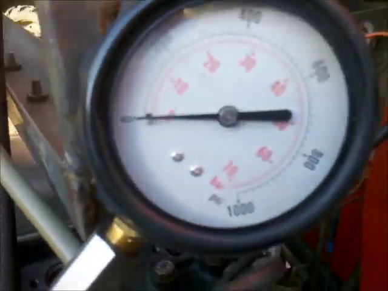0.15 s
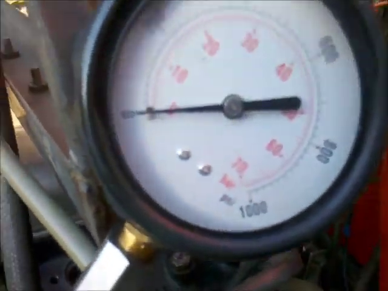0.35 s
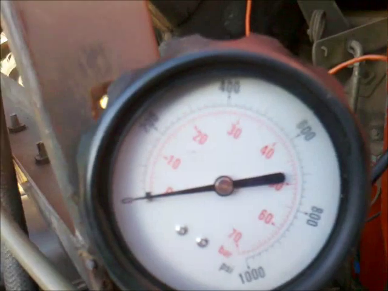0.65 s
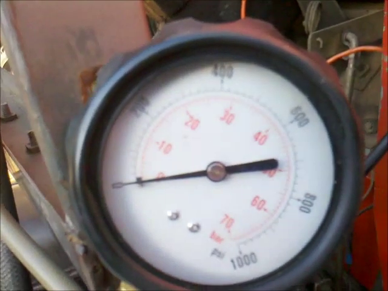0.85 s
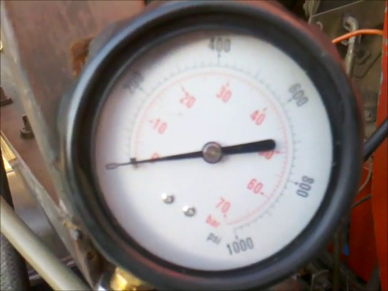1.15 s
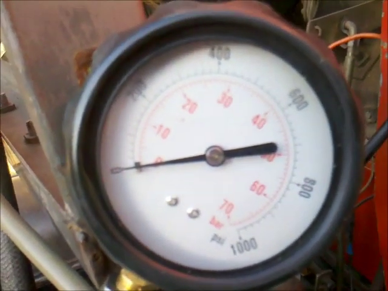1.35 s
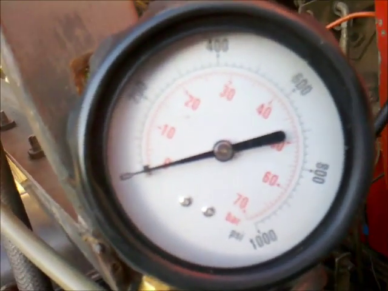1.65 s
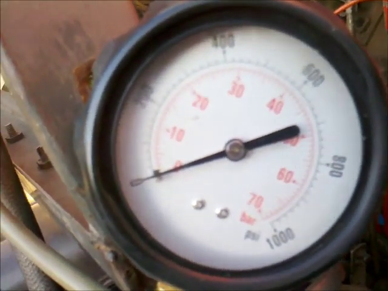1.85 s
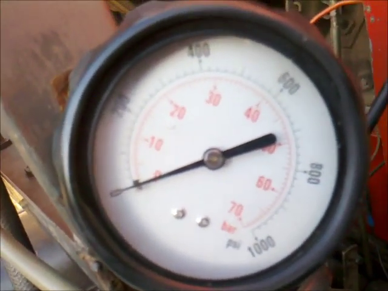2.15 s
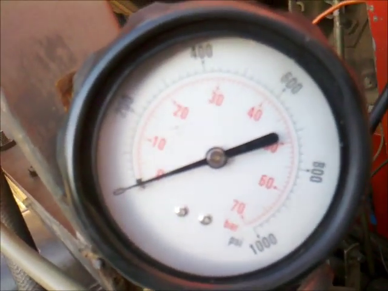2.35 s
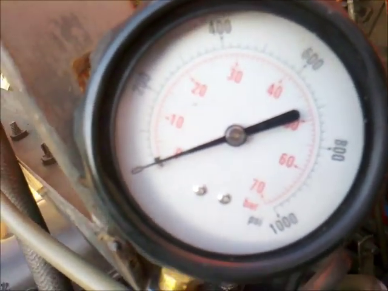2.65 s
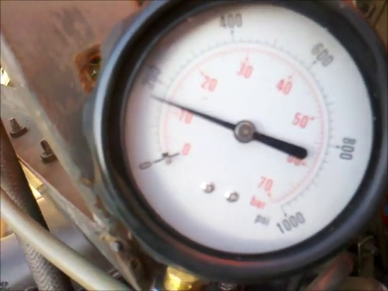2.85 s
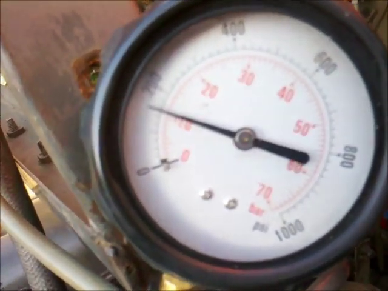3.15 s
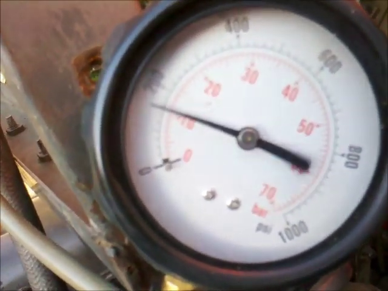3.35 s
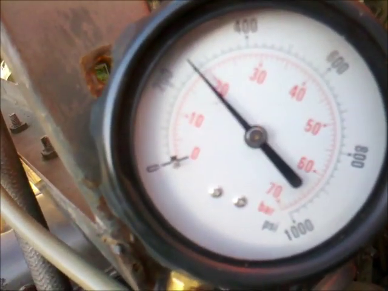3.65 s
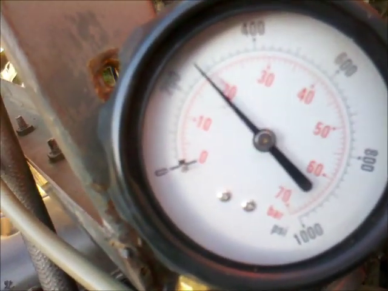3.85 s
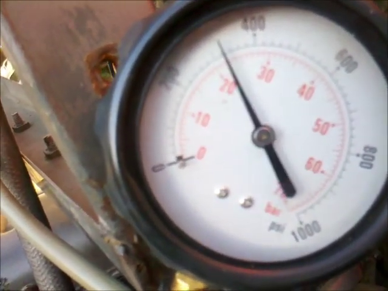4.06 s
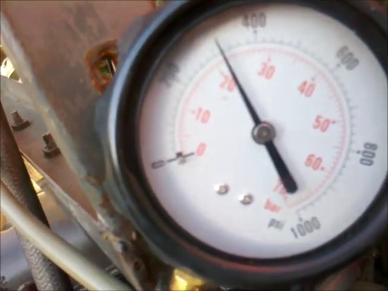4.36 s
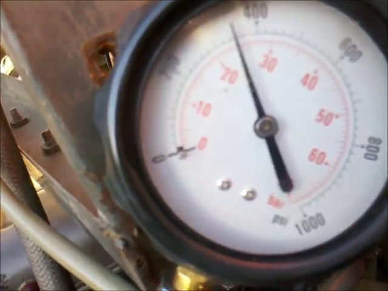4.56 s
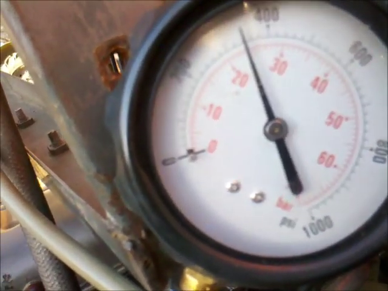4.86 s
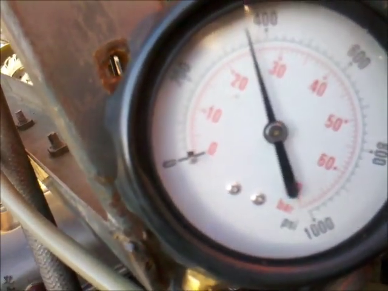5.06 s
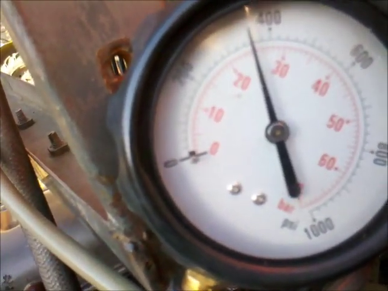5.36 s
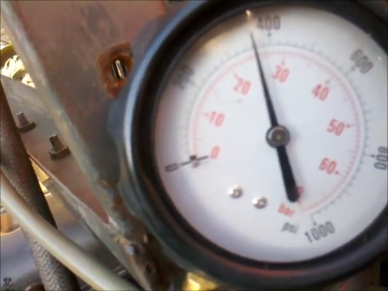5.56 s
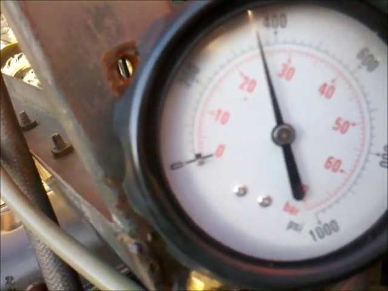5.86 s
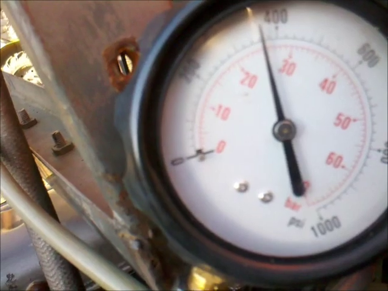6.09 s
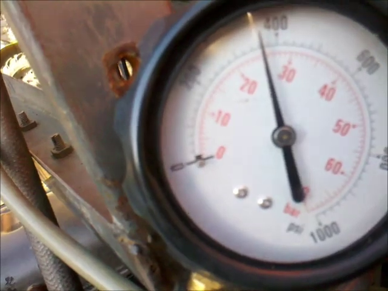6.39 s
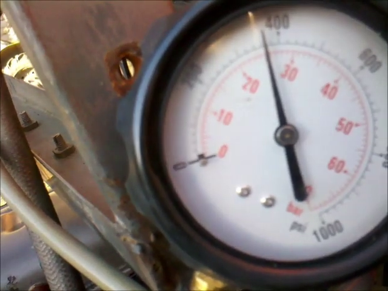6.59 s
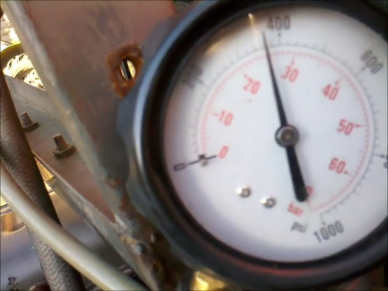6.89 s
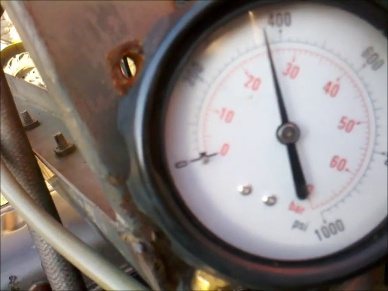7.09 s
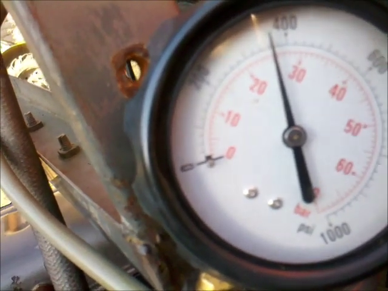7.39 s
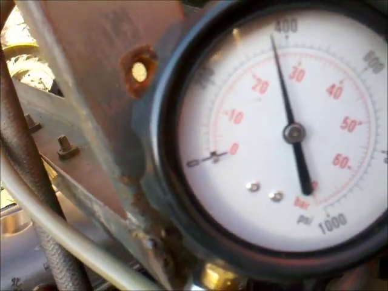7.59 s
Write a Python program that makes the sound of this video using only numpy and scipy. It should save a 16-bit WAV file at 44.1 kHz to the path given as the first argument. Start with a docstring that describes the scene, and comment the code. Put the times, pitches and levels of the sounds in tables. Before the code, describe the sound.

Birds twitter in a quiet shed, then a starter clacks in and cranks an engine with hard rhythmic air puffs before running down.

```python
"""In an open workshop, a four-cylinder diesel is cranked on its starter for a compression test.
Puffs of air noise blast from the open injector holes, two near and two far.
Evenly spaced gear knocks ring resonators for the casing, over starter whirr and a short gliding whine.
Before the key is turned: birds outside as gliding sines, a faint fading hiss and two soft knocks.
The hum of the shed, shaped noise, lies under everything; a stereo widening spreads it all."""
import sys
import numpy as np
from scipy import signal
from scipy.fft import rfft, irfft, next_fast_len
from scipy.io import wavfile
from scipy.ndimage import uniform_filter1d

SR = 44100
rng = np.random.default_rng(int(sys.argv[2]) if len(sys.argv) > 2 else 0)


def persist_wave(psi):
    """Save psi, clipped to +-1, as 16-bit WAV."""
    counts = np.round(np.clip(psi, -1, 1) * 32767).astype(np.int16)
    wavfile.write(sys.argv[1], SR, np.atleast_2d(counts).T)


N = 340923
T = np.arange(N) / SR
FRAME, HOP = 512, 128  # short-time spectra [samples]
HZ = np.fft.rfftfreq(FRAME, 1 / SR)
FRAME_S = np.arange(N // HOP + 2) * HOP / SR


def amp(db):
    """Amplitude factor for a level in dB."""
    return 10 ** (np.asarray(db) / 20)


def evened(x):
    """Scale a signal to an RMS of 1."""
    return x / np.sqrt(np.mean(x ** 2) + 1e-20)


def spectrum(points, hz):
    """Columns of a spectrum table, interpolated on a log-frequency axis."""
    f, *columns = np.transpose(points)
    return [np.interp(np.log(hz + 1), np.log(f + 1), c) for c in columns]


def curve(rows, at):
    """Columns of a table, interpolated linearly along its first column."""
    x, *columns = np.transpose(rows)
    return [np.interp(at, x, c) for c in columns]


def smooth_noise(count, size):
    """White noise averaged over size samples: a slow random wander."""
    return uniform_filter1d(rng.standard_normal(count), size=size)


def bell(hz, centre, width):
    """Resonance bump: 1 at the centre, half at half a width to either side."""
    return 1 / (1 + (2 * (hz - centre) / width) ** 2)


def add(mix, s, sound):
    """Mix a sound in, in place, from time s [s]."""
    part = mix[round(max(s, 0) * SR):][:len(sound)]
    part += sound[:len(part)]


def resonate(x, hz, width):
    """One resonance: shift the band down to zero, smooth it with one pole, shift it back."""
    turn = np.exp(2j * np.pi * hz * T[:len(x)])
    pole = np.exp(-np.pi * width / SR)
    return 2 * (turn * signal.lfilter([1 - pole], [1, -pole], x / turn)).real


def noise(gain, patchy_db, flicker_db):
    """Random short-time spectra; gain (bins x frames) is the root of the power per Hz."""
    a, b, patches = rng.standard_normal((len(FRAME_S), len(HZ), 3)).T
    patches = uniform_filter1d(patches, size=6, axis=0)
    patches = evened(uniform_filter1d(patches, size=12, axis=1))
    flicker = rng.standard_normal(len(FRAME_S))
    grain = a + 1j * b
    white = signal.istft(grain, nperseg=FRAME, noverlap=FRAME - HOP)[1]
    shaped = grain * gain * amp(patchy_db * patches + flicker_db * flicker)
    sound = signal.istft(shaped, nperseg=FRAME, noverlap=FRAME - HOP)[1][:N]
    return sound / white.std() * np.sqrt(SR / 2)


def room(x, t60, delay_s):
    """Decaying tail of random reflections, energy 1."""
    t = T[:SR // 2]
    tail = rng.standard_normal(len(t)) * amp(-60 * t / t60) * (t > delay_s)
    return signal.fftconvolve(x, tail / np.linalg.norm(tail))[:N]


# crank position, gathering speed, holding it, running down when the key is let go:
# (time [s], position [four-stroke cycles])
CRANK = [(2.56, 0), (2.99, .7), (3.16, 1), (3.688, 2), (4.716, 4), (5.225, 5), (5.745, 6), (7.295, 9),
         (7.52, 9.3), (7.73, 9.6)]
# air jet at the hole: (frequency [Hz], density against the blast level [dB per Hz],
# power of the flow it follows, share of the rumble setting it takes [0-1])
JET = [(40.3, -103, 1.7, 1), (118, -27.5, 8.6, 0.86), (326, -32.5, 2.6, 0), (595, -36.5, 6.7, 0.72),
       (900, -39.5, 2.2, 0.95), (1580, -37.5, 1.5, 0.23), (2520, -40.5, 3.36, 0.1), (6070, -45.5, 1.6, 0),
       (8060, -44, 0.76, 0), (10860, -36.5, 1.1, 0), (11630, -34.5, 1.23, 0.04), (15400, -42.5, 2.8, 0.11)]
# pipe resonances of the hole: (frequency [Hz], width [Hz], boost [dB])
HOLE = [(4160, 570, 8.5), (4815, 400, 6.5), (12140, 210, 6.5)]
# near and far holes, each blowing once a cycle: (start [cycle], end [cycle], level [dB],
# lateness of the peak [exponent], rumble [dB])
NEAR_HOLES = [(0.488, 0.687, -14, 1.327, -1), (0.693, 0.934, -14, 1.75, 1)]
FAR_HOLES = [(0.95, 1.172, -26.5, 0.88, -63), (0.32, 0.482, -35.5, 1.5, -11)]
# slow drift of the near blasts: (time [s], level [dB], low rumble against treble [dB])
DRIFT = [(2.9, -1, -6), (3.1, -1, -0.5), (4.1, -1, 0.5), (4.55, 0, -5.5), (5.1, -0.1, -1.5),
         (6.6, -1.3, -2), (7.1, -1, -1.5), (7.2, -2, 0.5)]
CYCLE_COUNT = 10  # cycles allowed for; the near holes blow only until one before this
SLOWING = 0.52  # far puffs lose this many dB for each dB the starter drops
CHOKE = 1.57  # how firmly the narrow hole limits the peak flow


def blasts():
    """The piston drives a dome of flow out of the hole: treble saturates early, rumble needs full flow."""
    jet_db, power, rumble_share = (c[:, None] for c in spectrum(JET, HZ))
    jet_db = jet_db + sum(db * bell(HZ[:, None], f, width) for f, width, db in HOLE)
    energy = np.zeros((len(HZ), len(FRAME_S)))
    crank = curve(CRANK, FRAME_S)[0]
    drift_db, drift_rumble_db = curve(DRIFT, FRAME_S)
    steady_db = STARTER[3][1]
    slowing_db = SLOWING * np.minimum(curve(STARTER, FRAME_S)[0] - steady_db, 0)
    for hole in NEAR_HOLES + FAR_HOLES:
        start, end, level_db, late, rumble_db = hole
        near = hole in NEAR_HOLES
        progress = (crank - start) % 1 / (end - start)
        blowing = (progress < 1) & (crank > start)
        if near:
            blowing &= crank < CYCLE_COUNT - 1
        dome = np.sin(np.pi * progress[blowing] ** late)
        flow = np.tanh(CHOKE * dome) / np.tanh(CHOKE)
        tint_db = rumble_share * (rumble_db + near * drift_rumble_db[blowing])
        level_db = level_db + (drift_db if near else slowing_db)[blowing]
        energy[:, blowing] += (amp(level_db + jet_db + tint_db) * flow ** power) ** 2
    crackle = amp(1.7 * evened(smooth_noise(N, 40)))  # eddies tear off unevenly
    return evened(crackle) * noise(np.sqrt(energy), patchy_db=2.0, flicker_db=1.5)


# starter motor before the load is added: (time [s], level [dB])
STARTER = [(2.575, -51), (2.6, -29), (2.95, -34.5), (7.2, -34.5), (7.3, -40.5), (7.38, -41), (7.48, -51),
           (7.73, -59)]
# compression load on the motor: (position [share of cycle], added level [dB])
LOAD = [(0, 3), (.12, 4), (.38, 4.5), (.56, 4), (1, 4.5)]
# gear knocks done: (time [s], count)
TEETH = [(2.56, -25), (2.99, -12.6), (3.275, 0), (3.796, 24), (4.3085, 48), (7.4, 192), (7.73, 200)]
# casing modes: (frequency [Hz], width of the narrower of two filters [Hz],
# level in the ring [dB], share of the swell [0-1])
CASING = [(281, 24, -4, 0.2), (417.3, 35, -2.5, 0.42), (478, 76, -6.5, 0.7), (716, 33, -3, 0.8),
          (757, 21, 0.5, 1), (917, 99, -2.5, 0.5), (1305, 128, -0.5, 1), (1374.5, 25, 1.5, 0.75),
          (1444, 77, -4, 1), (3620, 1120, 8, 0)]
# ring of the casing under load: (position [share of cycle], swell [dB])
SWELL = [(0, 2), (.07, -5), (.27, -3.5), (.4, 4.5), (.44, -1.5), (1, -3)]
# whirr: (frequency [Hz], density against the starter level [dB per Hz])
WHIRR = [(40, -97), (120, -35), (2000, -41.5), (2800, -84), (5500, -63), (13000, -45.5)]
KNOCKS_PER_CYCLE = 24
RIPPLE, FASTEST = .016, .08  # gear speed swing [share], where it is highest [share of cycle]
PLAY = .008  # backlash [teeth, RMS]
CHOP = .27  # share by which each tooth contact pumps the ring of the casing


def starter():
    """Gear teeth knock almost evenly and ring the casing; compression loads the motor once a cycle."""
    cycle = curve(CRANK, T)[0] % 1
    turn = curve(TEETH, T)[0] / KNOCKS_PER_CYCLE
    swing = RIPPLE / (2 * np.pi) * np.sin(2 * np.pi * (turn - FASTEST))
    teeth = (turn + swing) * KNOCKS_PER_CYCLE + .25
    teeth = teeth + PLAY * evened(smooth_noise(N, 1500))
    sizes = amp(1.2 * rng.standard_normal(KNOCKS_PER_CYCLE * (CYCLE_COUNT + 1)))
    size = sizes[np.floor(teeth).astype(int)]
    since = teeth % 1  # since the last contact [tooth spacings]
    push = np.sin(since * 110) * np.exp(-since / .03)  # the same firm push each time
    grit = .15 * rng.standard_normal(N) * np.exp(-since / .09)  # followed by a gritty scrape
    knocked = evened((push + grit) * size * since)
    knocked = knocked * np.interp(T, [7.35, 7.42], [1, .6])  # knocks soften once the pinion lets go
    bite = np.interp(T, [2.63, 2.66, 2.95], [1, .25, 1])  # gears whirr up after the pinion bites
    low = bite * knocked + .2 * rng.standard_normal(N)
    high = bite * (0.44 * knocked + rng.standard_normal(N))  # mostly steady gear mesh
    swell_db = curve(SWELL, cycle)[0]
    rings = np.zeros(N)
    for f, width, db, swell_share in CASING:
        drive = low if f < SR / 20 else high
        mode = resonate(resonate(drive, f, width), f, 3 * width)
        rings += amp(db + swell_share * swell_db) * evened(mode)
    chop_depth = CHOP * np.interp(T, [2.8, 3.1, 7.35, 7.42], [0, 1, 1, 0])
    chop = 1 + chop_depth * np.cos(2 * np.pi * (since - .3))
    whirr = noise(amp(spectrum(WHIRR, HZ)[0])[:, None], patchy_db=5.5, flicker_db=0.0)
    level_db = curve(STARTER, T)[0] + curve(LOAD, cycle)[0]
    return amp(level_db) * (T > STARTER[0][0]) * (chop * evened(rings) + bite * whirr)


# armature whine while the starter takes up the load, sags and runs up:
# (time [s], first order [Hz], level before the orders are weighted [dB])
WHINE = [(2.62, 199.6, -21), (2.7, 218.2, -25.5), (2.762, 247.5, -25.5), (2.78, 224.7, -27.5),
         (2.82, 223.5, -34), (2.85, 291, -21), (2.88, 345.4, -28.5), (2.93, 377, -35), (2.98, 395, -29),
         (3.05, 397, -35)]
# resonances of the housing that colour the whine: (frequency [Hz], gain [dB])
HOUSING = [(200, -0.5), (350, 5), (600, -17.5), (750, 9), (820, -5.5), (910, 2.5), (1050, -12), (1300, -2),
           (1700, -14)]


def whine():
    """Armature orders gliding with the motor speed, each loud where it crosses a resonance of the housing."""
    hz, db = curve(WHINE, T)
    turns = np.cumsum(hz * (1 + .7 * smooth_noise(N, 400))) / SR
    orders = np.zeros(N)
    for k, order_db in enumerate([-4, -3, -4, -1], start=1):
        gain_db = order_db + spectrum(HOUSING, k * hz)[0]
        orders += amp(gain_db) * np.sin(2 * np.pi * k * turns)
    rough = 1 + 9.0 * smooth_noise(N, 300)
    return amp(db) * rough * orders * (T > WHINE[0][0]) * (T < WHINE[-1][0])


# clacks: (time [s], peak level [dB], dullness [0-1])
CLACKS = [(0.117, -35, .5), (2.5807, -11, 0.1), (2.5948, -1, 0), (2.6042, -12, 0), (2.61, -2, 0),
          (2.6222, -5, 0.1), (7.565, -33, 0.8)]
# clack modes: (frequency [Hz], level when not dulled [dB], decay t60 [s])
CLACK_MODES = [(870, 13, 0.006), (4300, 17, 0.006), (5070, 19, 0.007), (10100, 21, 0.008),
               (12500, 25, 0.006)]
BLOW_S, RATTLE_S, RATTLE = .0018, .018, .25  # decay of blow [s], of rattle [s], rattle share


def clacks():
    """Short rattling blows: the starter engaging, plus duller single knocks before and after."""
    out, t = np.zeros(N), T[:3000]
    for s, peak_db, dull in CLACKS:
        blow = rng.standard_normal(len(t)) * (np.exp(-t / BLOW_S) + RATTLE * np.exp(-t / RATTLE_S))
        modes = np.zeros(len(t))
        for f, db, t60 in CLACK_MODES:
            dulled_db = db - 7.9 * dull * np.log2(f / 880)  # dull ones lose their upper modes
            modes += amp(dulled_db - 60 * t / t60) * np.sin(2 * np.pi * f * t)
        ring = evened(signal.fftconvolve(blow, modes)[:len(t)])
        hit = ring + 1.6 * (1 - dull) * evened(blow)
        add(out, s, amp(peak_db) * hit / abs(hit).max())
    return out


# soft low knocks: (time [s], frequency [Hz], level [dB], decay t60 [s])
THUDS = [(1.595, 205, -38, .15), (7.425, 290, -31, .1)]


def thuds():
    """A low decaying sine with a quicker overtone at 1.55 times its frequency, cut after 3000 samples."""
    out, t = np.zeros(N), T[:3000]
    for s, hz, db, t60 in THUDS:
        overtone = np.exp(-t / .012) * np.sin(3.1 * np.pi * hz * t)
        add(out, s, amp(db - 60 * t / t60) * (np.sin(2 * np.pi * hz * t) + overtone))
    return out


# near bird's twitters: (time [s], length [s], start [Hz], end [Hz],
# level before distance and echoes [dB], chirp rate [per s])
TWITTERS = [(0, 0.16, 4090, 3850, -44.5, 33), (0.154, 0.17, 4390, 3380, -39.5, 27.6),
            (0.691, 0.16, 4540, 3270, -45.5, 20.6), (0.84, 0.13, 4540, 4700, -51.5, 27),
            (0.924, 0.16, 3970, 2905, -41.5, 19), (1.11, 0.061, 4400, 4630, -46.5, 31),
            (1.207, 0.01, 4840, 4320, -42, 42), (1.495, 0.075, 4970, 4540, -59.5, 26),
            (1.634, 0.18, 3910, 3080, -40.5, 18), (1.983, 0.27, 4290, 3460, -44.5, 33.5),
            (2.335, 0.15, 4200, 2810, -44, 14)]
CHIRP_DEPTH = .12  # up-and-down swing of the pitch [share]
SCRATCH, BREAKS = .33, .8  # strength of the pitch roughness, of the level breaks


def near_bird():
    """Warbled, broken sine slides, heard partly direct and partly through echoes."""
    bird = np.zeros(N)
    for s, length, start_hz, end_hz, db, per_s in TWITTERS:
        t = np.arange(0, length, 1 / SR)
        slide = start_hz + (end_hz - start_hz) * t / length
        hz = slide * (1 - CHIRP_DEPTH * np.cos(2 * np.pi * per_s * t))
        hz = hz * (1 + SCRATCH * smooth_noise(len(t), 50))
        notes = np.clip(1 + BREAKS * evened(smooth_noise(len(t), 300)), 0, 3)
        tone = np.sin(2 * np.pi * np.cumsum(hz) / SR)
        add(bird, s, amp(db) * notes * tone * signal.windows.tukey(len(t), .6))
    return 0.54 * bird + .75 * room(bird, .1, .002) + .3 * room(bird, .45, .02)


# far bird, one list a whistle: (time [s], frequency [Hz], level of the direct sound [dB])
WHISTLES = [
    [(1.4, 1855, -71), (1.56, 2110, -63), (1.64, 2100, -72)],
    [(1.75, 2180, -60), (1.79, 2260, -52), (1.89, 2363, -68), (2.12, 2170, -70)],
    [(2.5, 2290, -58), (2.575, 1930, -65)],
]


def far_bird():
    """Slow gliding sines with echoes stronger than the direct sound."""
    bird = np.zeros(N)
    for rows in WHISTLES:
        t = np.arange(rows[0][0], rows[-1][0], 1 / SR)
        hz, db = curve(rows, t)
        tone = np.sin(2 * np.pi * np.cumsum(hz) / SR)
        add(bird, t[0], amp(db) * tone * signal.windows.tukey(len(t), .1))
    return bird + amp(3) * room(bird, 0.4, 0.012)


# hum of the shed: (frequency [Hz], density [dB per Hz])
SHED = [(40, -104), (100, -80), (200, -78), (300, -81), (600, -94.5), (1500, -101), (5500, -110),
        (14000, -103)]
# narrow band in the hum: (frequency [Hz], width of the narrower of two filters [Hz], level [dB])
DRONE = (365, 35, -63)
# faint hiss before bands and fade: (frequency [Hz], density [dB per Hz])
FAINT_HISS = [(600, -100), (1400, -98.5), (2500, -99), (6500, -101), (10000, -98), (13000, -93)]
# fade of the hiss: (time [s], level [dB])
FAINT_LEVEL = [(0, -1), (.12, 5.5), (.45, 1), (.57, -8), (.66, -24), (1.2, -32)]
# bands that sink and stand out as the hiss fades: (start [Hz], end [Hz], width [Hz], final boost [dB])
FAINT_BANDS = [(13000, 12000, 1100, 15), (10800, 10200, 930, 12)]


def background():
    """Low hum of the shed as shaped noise, with a faint hiss that fades in about the first second."""
    hum = amp(spectrum(SHED, HZ)[0])[:, None]
    gone = np.clip(FRAME_S / .55, 0, 1)
    bands_db = 0
    for start_hz, end_hz, width, boost_db in FAINT_BANDS:
        centre = start_hz + (end_hz - start_hz) * gone
        bands_db = bands_db + gone * boost_db * bell(HZ[:, None], centre, width)
    hiss = amp(spectrum(FAINT_HISS, HZ)[0][:, None] + bands_db + curve(FAINT_LEVEL, FRAME_S)[0])
    hz, width, drone_db = DRONE
    band = resonate(resonate(rng.standard_normal(N), hz, width), hz, 2 * width)
    return amp(drone_db) * evened(band) + noise(np.hypot(hum, hiss), patchy_db=.8, flicker_db=.3)


def workshop():
    """All sources at one point in the shed; the engine sounds also ring in a short room."""
    engine = blasts() + starter() + whine() + clacks() + thuds()
    return engine + amp(-11.0) * room(engine, 0.12, 0.0035) + near_bird() + far_bird() + background()


# stereo widening: (frequency [Hz], phase by which right leads [rad], likeness [0-1])
WIDENING = [(0, -3.14, 1), (120, -3.0, .97), (300, -2.7, .9), (620, -1.9, .35), (800, -.4, .7),
            (1200, .1, .85), (2000, .1, .8), (2300, -.8, .25), (2750, -2.9, .7), (3800, -3.2, .75),
            (5400, -6.4, .9), (6100, -6.8, .35), (7000, -6.3, .2), (8500, -2.6, .15), (9100, -.3, .9),
            (10200, .2, .8), (11000, 3.0, .3), (11900, 5.8, .85), (13100, 6.6, .85), (13700, 9.3, .5)]


def scene():
    """Both channels share one sound; a second draw, a quarter turn either way, makes them differ."""
    size = next_fast_len(N + SR // 10)
    lead, like = curve(WIDENING, np.fft.rfftfreq(size, 1 / SR))
    like = np.clip(like, 0, 1)
    side = np.array([[-1], [1]])  # left, right
    shared, own = rfft(workshop(), size), rfft(workshop(), size)
    channels = np.sqrt((1 + like) / 2) * shared + 1j * side * np.sqrt((1 - like) / 2) * own
    return irfft(channels * np.exp(.5j * lead * side), size)[:, :N]


EDGE_HZ = 14000  # upper band limit


def record(dry):
    """Bass roll-off below 70 Hz, clipping, then the band limit."""
    bass_cut = signal.butter(4, 70, "high", fs=SR, output="sos")
    heard = np.clip(signal.sosfilt(bass_cut, dry), -1, 1)
    band_limit = signal.firwin(401, EDGE_HZ, window=("kaiser", 9), fs=SR)
    return signal.oaconvolve(heard, band_limit[None], "same")


dry = scene()
out = record(dry)
persist_wave(out)
```